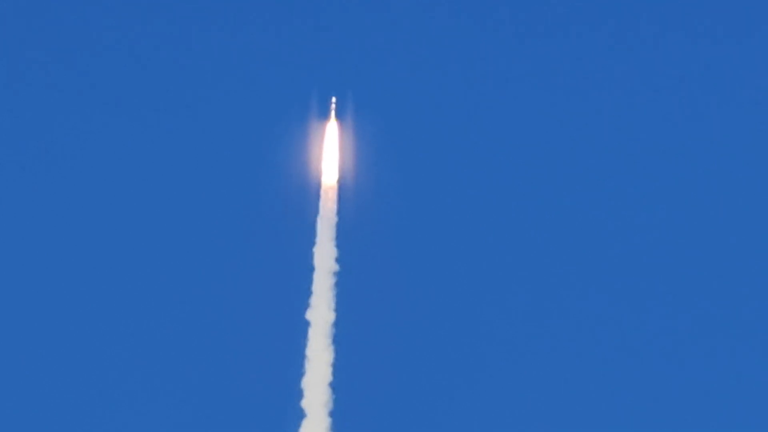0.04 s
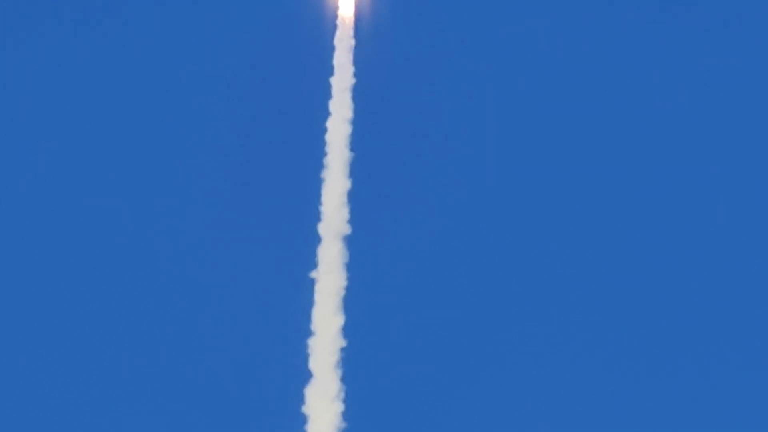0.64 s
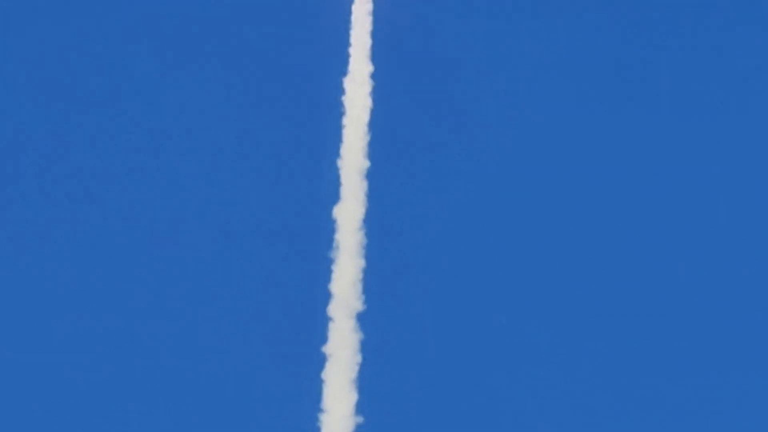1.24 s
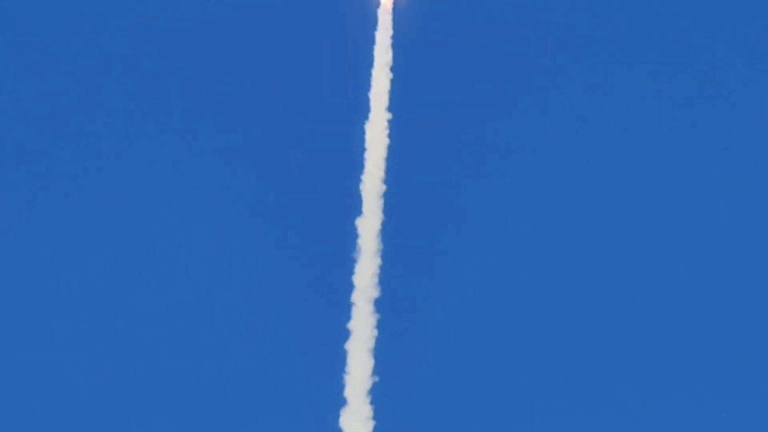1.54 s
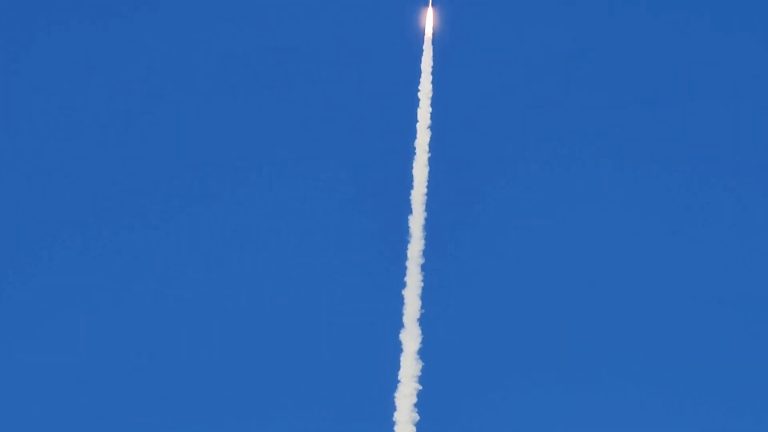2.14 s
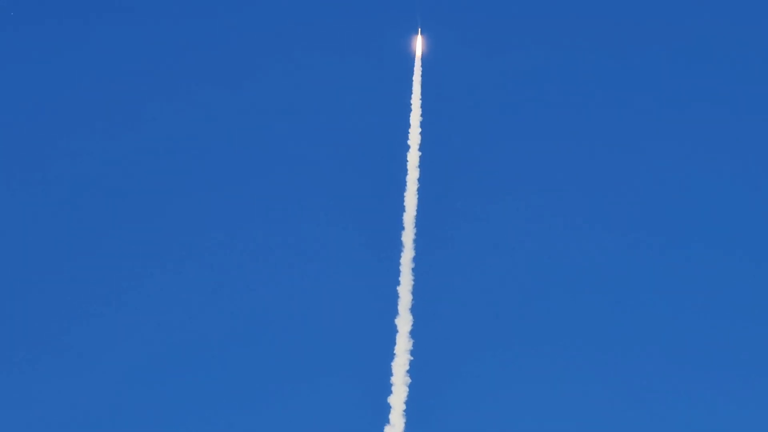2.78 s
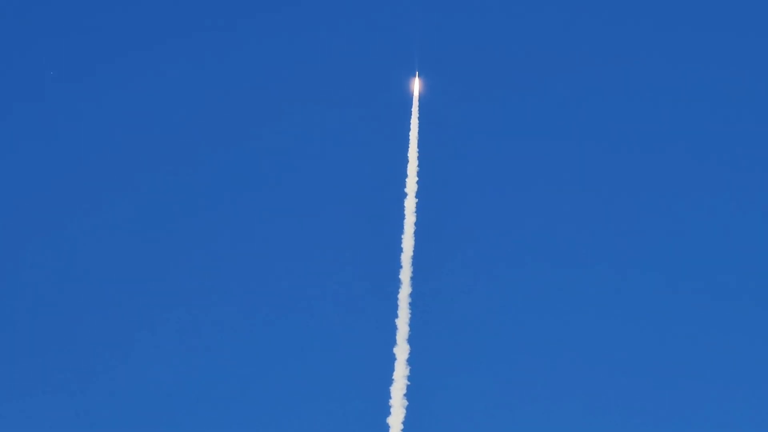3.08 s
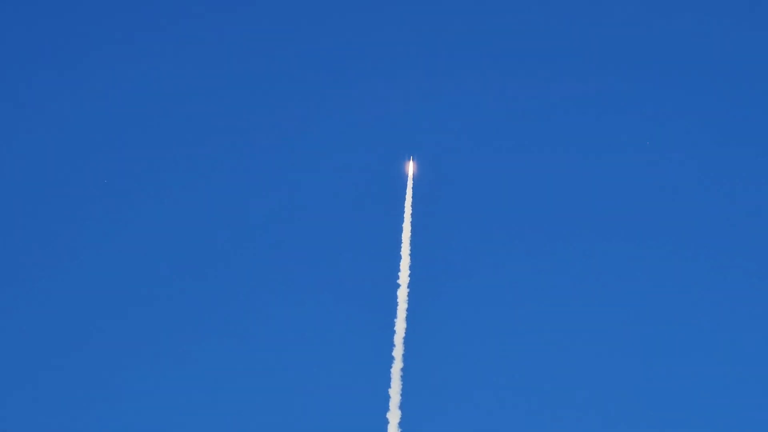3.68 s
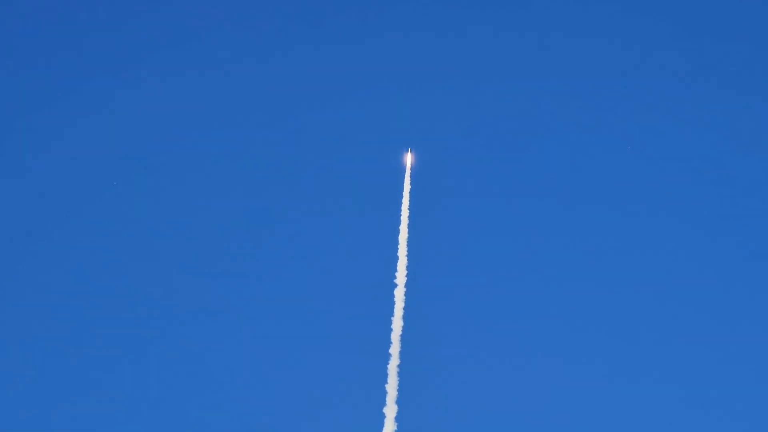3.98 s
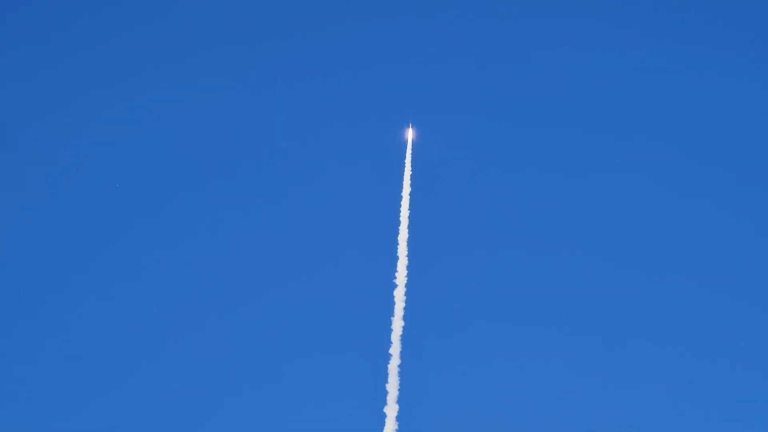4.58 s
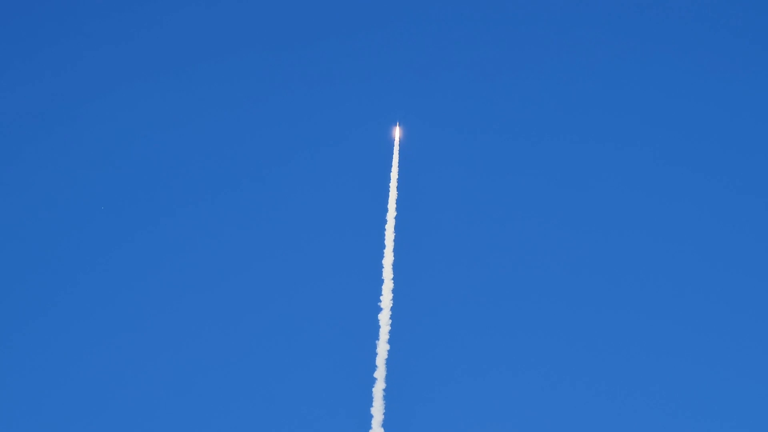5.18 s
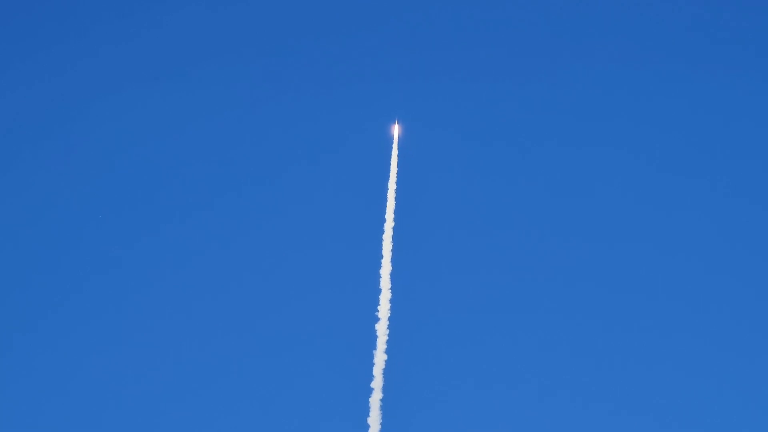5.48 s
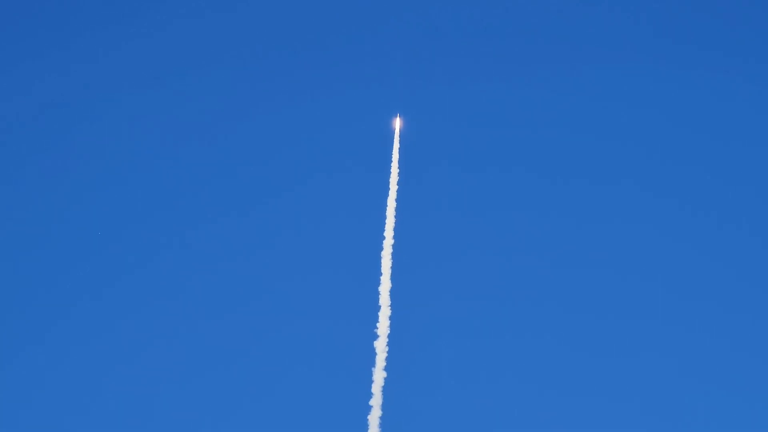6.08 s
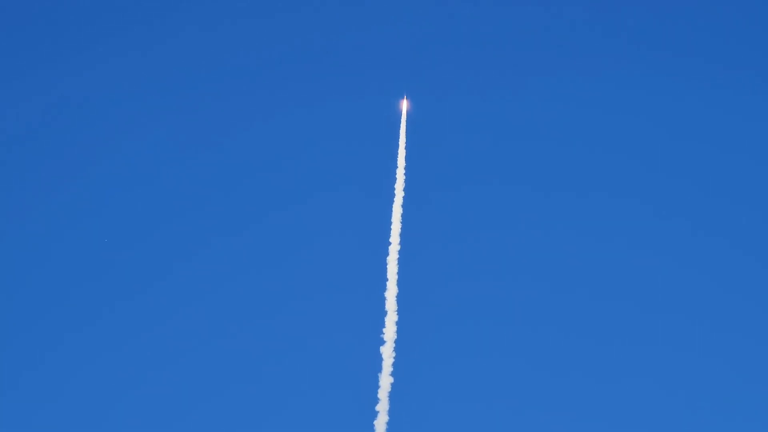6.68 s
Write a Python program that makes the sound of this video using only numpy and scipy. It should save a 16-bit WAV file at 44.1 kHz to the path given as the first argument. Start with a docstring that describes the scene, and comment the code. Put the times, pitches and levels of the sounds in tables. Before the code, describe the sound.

Wind booms and thumps on the microphone over a far rocket's low, rolling rumble, as crackling tyre hiss swells early and slowly recedes.

```python
"""A rocket climbs far away: a steady, rolling rumble, its exhaust roar worn down to bass by miles of air.
Close by, a gritty hiss like a passing vehicle's tyres swells, peaks just after one second and recedes
with a fast flutter. Stones snap under the tread and the engine drones beneath the rumble.
Wind booms, swirls and thumps on the microphone throughout."""
import sys
import numpy as np
from scipy import signal
from scipy.fft import rfft, irfft, next_fast_len
from scipy.io import wavfile
from scipy.ndimage import uniform_filter1d, minimum_filter1d

SR = 44100
rng = np.random.default_rng(int(sys.argv[2]) if len(sys.argv) > 2 else 0)


def digitize_waveform(pressure):
    """Quantize a signal to 16-bit integers and store it at the path in sys.argv[1].

    Rows of a 2-D input are taken as channels; values are limited to [-1, 1].
    """
    field = np.atleast_2d(pressure).T
    bounded = np.clip(field, -1, 1)
    quanta = np.round(bounded * 32767).astype(np.int16)
    wavfile.write(sys.argv[1], SR, quanta)


N = 305613
TIME = np.arange(N) / SR

# The rocket's fader ride. Each row: time in seconds, relative level in dB.
ROCKET_RIDE = [(0.0, -26.5), (0.5, -21), (0.7, -22), (0.9, -18.5), (2.1, -25.5), (2.4, -28.6), (3.0, -24.5),
               (3.5, -27), (3.6, -21.5), (3.8, -30), (3.9, -26.5), (4.2, -27.5), (4.5, -22), (4.7, -24.5),
               (4.8, -24), (6.9, -25)]
# The rocket's tone. Each row: frequency in Hz, relative level in dB.
ROCKET_EQ = [(50, -37.5), (90, -5.5), (112, 0), (150, 1.5), (180, -0.5), (205, -4.5), (240, -7.5),
             (280, -16), (340, -23.5), (450, -38.5)]

# Tyre tone from the front, side and rear. Each row: frequency in Hz, relative level in dB.
FRONT_EQ = [(300, -7), (550, 2.5), (900, -5), (1150, -7), (1650, -11.5), (2100, -14.5), (2700, -12),
            (3300, -18), (4300, -18.5), (5500, -24.5), (8000, -37), (15000, -55)]
SIDE_EQ = [(250, -15), (450, -12.5), (750, -4.5), (1100, -7), (1550, -2.5), (1850, -7.5), (2400, -7),
           (3200, -13.5), (4000, -9), (6500, -14.5), (10000, -21.5), (15500, -34.5)]
REAR_EQ = [(300, -13.5), (600, -3.5), (900, -1.5), (1400, -9.5), (1800, -8), (2500, -9), (3200, -15.5),
           (3900, -9), (4900, -10.5), (5400, -16.5), (7000, -19.5), (9500, -26.5), (12000, -36.5),
           (15500, -57)]
# Tread and wheel-arch resonances. Each row: centre and width in Hz, front, side and rear gain in dB.
TREAD_RESONANCES = [(668, 63, -6.5, 11, 8), (1200, 64, 8, -4.5, 8.5), (1650, 77, 7.5, -6, 0.5),
                    (2260, 150, -0.5, 2, -0.5), (2450, 73, 2, -4.5, 1), (3870, 430, 3, 2, 2.5),
                    (4750, 200, -1, 4.5, 3.5)]
# The tread's low, middle and high howl. Each row: pitch coming, pitch going and width, all in Hz.
HOWL_BANDS = [(862, 822, 58), (1384, 1360, 72), (2760, 2550, 400)]
# Steady gain of the low, middle and high howl in dB.
HOWL_STEADY_DB = [6.5, 4.5, -0.5]
# The howls flare in turn. Each row: centre and half length in seconds, low, middle and high gain in dB.
FLARES = [(.72, 0.088, 10.5, -1, -5), (1.03, .14, 6.5, -1, 0), (1.45, 0.29, -4, 7, -2.5),
          (2.2, 0.12, 9, -9, -2), (3.9, 1, 5, 1.5, -1.5), (5.4, .5, 2.5, 0, 4.5), (6.8, .12, -9, -5, 9)]
# The far hiss swells on the wind. Each row: centre and half length in seconds, lift in dB.
HISS_SWELLS = [(3.45, 0.17, 3), (4.2, 0.27, 3.5), (4.99, 0.19, 8), (5.5, 0.073, 4.5), (5.73, .09, 5.5),
               (6.13, .07, 7.5)]
# Stones snapping under the tyres. Each row: start in seconds, relative peak in dB.
STONE_SNAPS = [(0.892, -34), (1.034, -22), (1.1857, -17), (1.233, -26), (1.381, -38), (1.6624, -28),
               (1.8786, -37), (3.112, -52), (3.832, -40), (5.0868, -61)]
# The vehicle's exhaust note. Each row: time in seconds, pitch in Hz, relative level in dB.
ENGINE_NOTE = [(0, 135.8, -38.5), (1, 136.2, -23), (1.5, 132, -26.5), (2.1, 131, -29.5), (2.35, 125.9, -23),
               (2.8, 122.7, -27), (3.3, 124.1, -18.5), (3.55, 126.2, -31), (3.85, 125.8, -20),
               (4.4, 124, -51.5)]

# Gusts on the microphone. Each row: centre and half length in seconds, boom and eddy level in dB.
WIND_GUSTS = [(.17, .08, -21.5, -32.5), (.5, 0.12, -17, -32), (.72, 0.14, -22.5, -31.5),
              (1.3, 0.32, -26, -32.5), (2.15, 0.088, -34, -35), (2.52, 0.088, -20.5, -36),
              (3.0, .08, -45, -30), (3.29, .06, -23, -31.5), (3.55, .2, -27, -56),
              (4.3, 0.12, -24.5, -42.5), (4.7, 0.33, -32, -38), (5.25, 0.27, -22, -39),
              (5.85, 0.16, -27, -38.5), (6.17, .08, -22, -47.5), (6.66, 0.21, -22.5, -50),
              (6.86, .09, -22, -34)]
# Tone of the wind's boom and of its finer eddies. Each row: frequency in Hz, relative level in dB.
BOOM_EQ = [(15, -48.5), (24, -36), (33, -25.5), (44, -9.5), (54, -12), (63, -3.5), (78, -0.5), (98, -7.5),
           (115, -14), (160, -31.5)]
EDDY_EQ = [(120, -32.5), (220, -0.5), (300, 0), (400, -5.5), (550, -11), (800, -22.5), (1200, -32.5),
           (2000, -37.5), (4000, -58.5)]
# Single wind thumps. Each row: time in seconds, level in dB, spike half width in seconds, swing in Hz.
WIND_THUMPS = [(0.158, -29, 0.00077, 240), (1.099, -3.5, 0.0019, 135), (2.2387, -8.5, 0.00071, 170),
               (2.552, -3, 0.00064, 149), (3.2486, -2, 0.00069, 160), (3.2747, -10, 0.0013, 120),
               (3.3128, -10.5, 0.00063, 110), (3.438, -7, 0.0017, 110), (3.451, -6, 0.0011, 269),
               (5.745, -12.5, 0.00073, 227), (5.752, -12, 0.0013, 240)]

# Random wobble for the rocket, tyres, engine and eddies. Each row: rate in Hz, relative strength in dB.
ROLL_RATES = [(1, -12.5), (3, 6), (5, -11.5)]
SPUTTER_RATES = [(2, -16.5), (12, 0.5), (110, -2.5)]
WAVER_RATES = [(1, 4), (9, -3.5)]
LUMP_RATES = [(5, 8.0), (70, -9)]

PASS_S, MISS_S = 1.139, 0.19  # when the vehicle is abreast; its closest distance over its speed


def rocket_rumble(trim_db=1.5, roll_db=0.96):
    """Exhaust roar after miles of air: only the bass is left, and it rolls."""
    roar = steadied(coloured(rng.standard_normal(N), ROCKET_EQ), size=4000)
    ride_db, = follow(ROCKET_RIDE, TIME)
    return roar * gain_of(ride_db + trim_db + roll_db * wobble(ROLL_RATES))


def tyres(patch_db=1.51, dull_from_hz=4800):
    """The hiss changes colour as the vehicle goes by, and loses its treble with distance."""
    hz, t, spectrum = signal.stft(grit(), SR, nperseg=1024, noverlap=768)
    eq_db = tread_tone(hz, t) + howls(hz, t)
    loud_db, treble_db = drive_by(t)
    body_db = band_db(eq_db, hz, 1200, 6000)
    top_db = band_db(eq_db, hz, 7000, 12000) - body_db
    # the air takes more the higher the frequency
    absorbed = np.clip(np.log2((hz + 1) / dull_from_hz) / 0.78, 0, 1.5)
    eq_db += np.outer(absorbed, treble_db - top_db) + loud_db - body_db
    eq_db += far_fading(hz, t)
    # moving air brings the sound in patches
    patches = uniform_filter1d(rng.standard_normal(spectrum.shape), size=8, axis=0)
    eq_db += patch_db * unit_rms(uniform_filter1d(patches, size=7, axis=1))
    return signal.istft(spectrum * gain_of(eq_db), SR, nperseg=1024, noverlap=768)[1][:N]


def grit(grains_per_s=700, spread_db=3.5, grain_db=-4, flutter_hz=20.58, rise_hz_per_s=0.38):
    """Dense tiny snaps in a smooth hiss, fluttering as the wheels turn."""
    hits = rng.random(N) < grains_per_s / SR
    snaps = hits * gain_of(spread_db * np.minimum(rng.exponential(1, N), 3.2))
    snaps *= rng.choice([-1, 1], N)
    hiss = rng.standard_normal(N) + gain_of(grain_db) * unit_rms(snaps)
    rate_hz = flutter_hz + rise_hz_per_s * (TIME - PASS_S)
    flutter_db = 1.18 * np.cos(2 * np.pi * np.cumsum(rate_hz) / SR)
    # the sputter deepens over time, for the lengthening path through gusty air
    sputter_db = np.linspace(1, 2.02, N) * wobble(SPUTTER_RATES)
    return unit_rms(hiss * gain_of(flutter_db + sputter_db))


def tread_tone(hz, t):
    """Tyre EQ in dB with tread and wheel-arch resonances, crossfading from front to side to rear."""
    side = facing(t)
    front, rear = np.clip(-side, 0, 1), np.clip(side, 0, 1)
    blend = np.array([front, 1 - front - rear, rear])
    eq_db = np.transpose([eq_at(view, hz) for view in (FRONT_EQ, SIDE_EQ, REAR_EQ)]) @ blend
    for centre, width, *gains_db in TREAD_RESONANCES:
        eq_db += np.outer(bell(hz - centre, width), np.array(gains_db) @ blend)
    return eq_db


def howls(hz, t):
    """EQ in dB for the tread's broad whistles, which drop in pitch as the vehicle passes."""
    gone = (1 + np.tanh(4 * facing(t))) / 2
    shapes, *flares_db = humps(FLARES, t)
    eq_db = 0
    for (coming, going, width), steady_db, flare_db in zip(HOWL_BANDS, HOWL_STEADY_DB, flares_db):
        pitch_hz = coming + gone * (going - coming)
        eq_db += (steady_db + shapes @ flare_db) * bell(hz[:, None] - pitch_hz, width)
    return eq_db


def facing(t, lag_s=0.22, coming_s=0.48, going_s=1.22):
    """The side heard, -1 front to 1 rear: it turns just after the pass, fast coming and slow going."""
    since = t - PASS_S - lag_s
    return np.tanh(since / np.where(since < 0, coming_s, going_s))


def drive_by(t, level_db=-30, rear_db=2.5, treble_db=-11.5, coming_db_per_s=22.5, going_db_per_s=3.5):
    """Tyre level and treble share in dB: a straight pass at steady speed, falling as 1 / distance."""
    since = t - PASS_S
    distance = np.hypot(1, since / MISS_S)
    loud_db = level_db - 20 * np.log10(distance) + rear_db * facing(t)
    return loud_db, treble_db - abs(since) * np.where(since < 0, coming_db_per_s, going_db_per_s)


def far_fading(hz, t, sink_at_s=4.58, sink_s=0.36, sink_db=6.5, above_hz=1000):
    """EQ in dB: far off, the upper hiss sinks and returns in brief swells while the lows carry on."""
    sunk = (1 + np.tanh((t - sink_at_s) / sink_s)) / 2
    shapes, lift_db = humps(HISS_SWELLS, t)
    high_shelf = 1 - 1 / (1 + (hz / above_hz) ** 5)
    return np.outer(high_shelf, shapes @ lift_db - sink_db * sunk)


def stones(trim_db=-1, decay_s=0.0056, low_hz=1400, near_hz=9000, far_hz=5000):
    """Larger grains crack with a burst a few milliseconds long, duller as the vehicle leaves."""
    out, t = np.zeros(N), np.arange(SR // 20) / SR
    for start, db in STONE_SNAPS:
        high_hz = np.interp(start, [0, TIME[-1]], [near_hz, far_hz])
        band = signal.butter(3, [low_hz, high_hz], "band", fs=SR, output="sos")
        crack = signal.sosfilt(band, rng.standard_normal(len(t)) * np.exp(-t / decay_s))
        add(out, start, gain_of(db + trim_db) * crack / abs(crack).max())
    return out


def engine_drone(trim_db=-1, waver=0.013, fading_db=0.5):
    """One low exhaust tone, dropping as the vehicle goes by, wavering and fading in the wind."""
    hz, db = follow(ENGINE_NOTE, TIME)
    cycles = np.cumsum(hz * (1 + waver * wobble(WAVER_RATES))) / SR
    tone = np.sqrt(2) * np.sin(2 * np.pi * cycles)
    return tone * gain_of(db + trim_db + fading_db * wobble(WAVER_RATES))


def wind(breeze_boom_db=-28, breeze_eddy_db=-40.5, lump_db=3.0):
    """Large slow eddies boom on the microphone; finer, lumpy ones swirl around its port."""
    boom = steadied(coloured(rng.standard_normal(N), BOOM_EQ), size=3500)
    lumps = gain_of(lump_db * wobble(LUMP_RATES))
    eddies = steadied(coloured(rng.standard_normal(N) * lumps, EDDY_EQ), size=5000)
    # gusts add their power to the steady breeze
    shapes, boom_db, eddy_db = humps(WIND_GUSTS, TIME)
    push = np.sqrt(gain_of(breeze_boom_db) ** 2 + shapes @ gain_of(boom_db) ** 2)
    swirl = np.sqrt(gain_of(breeze_eddy_db) ** 2 + shapes @ gain_of(eddy_db) ** 2)
    return push * boom + swirl * eddies


def wind_thumps(ring_q=2.04, wake_db=-18, wake_s=0.0064, whirl_cycles=0.337):
    """An eddy hits as one pressure spike; the microphone passes no steady pressure, so it swings back."""
    out, t = np.zeros(N), np.arange(-SR // 50, SR // 15) / SR
    for at_s, db, width_s, swing_hz in WIND_THUMPS:
        omega = 2 * np.pi * swing_hz
        swing = signal.bilinear([1, 0, 0], [1, omega / ring_q, omega * omega], SR)
        thump = signal.lfilter(*swing, np.exp(-(t / width_s) ** 2))
        # smaller whirls travel with the eddy and roughen the knock; a broad eddy has slow whirls
        wake_hz = whirl_cycles / width_s
        wake_band = signal.butter(4, [wake_hz / 3, wake_hz], "band", fs=SR, output="sos")
        whirls = unit_rms(signal.sosfilt(wake_band, rng.standard_normal(len(t))))
        wake = gain_of(wake_db) * whirls * np.exp(-(t / wake_s) ** 2)
        add(out, at_s + t[0], gain_of(db) * (thump / abs(thump).max() + wake))
    return out


def gain_of(db):
    """Decibels to amplitude."""
    return 10 ** (np.asarray(db) / 20)


def unit_rms(x):
    """Scales to rms 1."""
    return x / np.sqrt(np.mean(x ** 2) + 1e-20)


def eq_at(points, hz):
    """An EQ curve in dB, joined by straight lines over log frequency."""
    point_hz, db = np.transpose(points)
    return np.interp(np.log(hz + 1), np.log(point_hz + 1), db)


def bell(offset_hz, width_hz):
    """A resonant peak of height 1."""
    return 1 / (1 + (2 * offset_hz / width_hz) ** 2)


def follow(rows, t):
    """The columns of an automation curve at the times t."""
    times, *columns = np.transpose(rows)
    return [np.interp(t, times, column) for column in columns]


def humps(rows, t):
    """One smooth rise and fall for each row, then the rows' remaining columns."""
    centre, half_length, *columns = np.transpose(rows)
    return np.exp(-((t[:, None] - centre) / half_length) ** 2), *columns


def coloured(x, points):
    """Runs x through an EQ curve that falls away steeply above its last point."""
    size = next_fast_len(N)
    hz = np.fft.rfftfreq(size, 1 / SR)
    roll_off = 1 / (1 + (hz / points[-1][0]) ** 8)
    return irfft(rfft(x, size) * gain_of(eq_at(points, hz)) * roll_off, size)[:N]


def wobble(rates):
    """Random modulation at rms 1."""
    return unit_rms(coloured(rng.standard_normal(N), rates))


def steadied(x, size):
    """Holds the running rms at 1, leaving only the fast roughness."""
    power = uniform_filter1d(uniform_filter1d(x ** 2, size), size)
    return x / np.sqrt(abs(power) + 1e-20)


def band_db(eq_db, hz, low_hz, high_hz):
    """Level of one band in each frame."""
    in_band = (hz > low_hz) & (hz < high_hz)
    return 10 * np.log10((gain_of(eq_db[in_band]) ** 2).sum(0) / len(hz))


def add(mix, at_s, sound):
    """Mixes a sound in at the given time."""
    part = mix[max(round(at_s * SR), 0):][:len(sound)]
    part += sound[:len(part)]


def scene():
    """Rocket, wind and road at one microphone."""
    return (rocket_rumble() + wind() + wind_thumps() + engine_drone() + tyres() + stones())[None]


def record(dry, bass_cut_hz=39.8, hiss_db=-82.5, ceiling=0.95, top_cut_hz=15720):
    """The microphone's bass cut and faint hiss, a smooth peak limiter, then a steep top cut."""
    bass_cut = signal.butter(2, bass_cut_hz, "high", fs=SR, output="sos")
    noisy = signal.sosfiltfilt(bass_cut, dry) + gain_of(hiss_db) * rng.standard_normal(dry.shape)
    allowed = np.minimum(1, ceiling / (abs(noisy) + 1e-9))
    held = minimum_filter1d(allowed, size=600)
    gain = uniform_filter1d(uniform_filter1d(held, size=300), size=300)
    top_cut = signal.firwin(1023, top_cut_hz, window=("kaiser", 9), fs=SR)
    return signal.oaconvolve(noisy * gain, top_cut[None], "same")


dry = scene()
out = record(dry)
digitize_waveform(out)
```